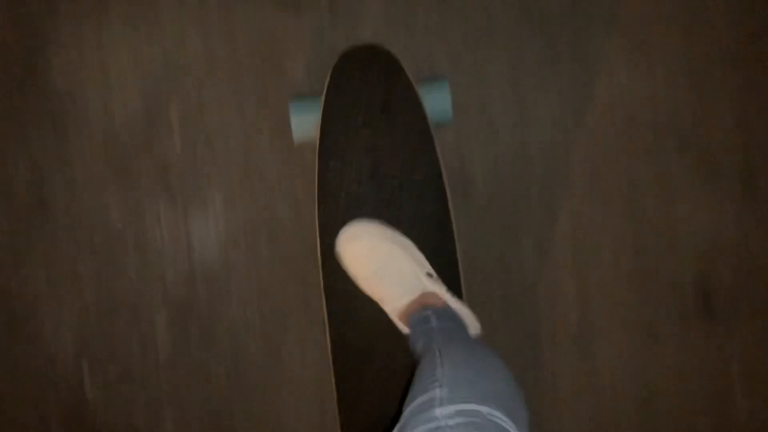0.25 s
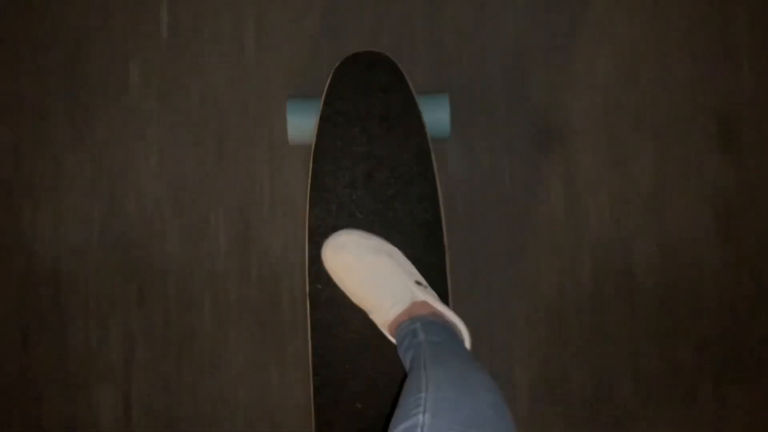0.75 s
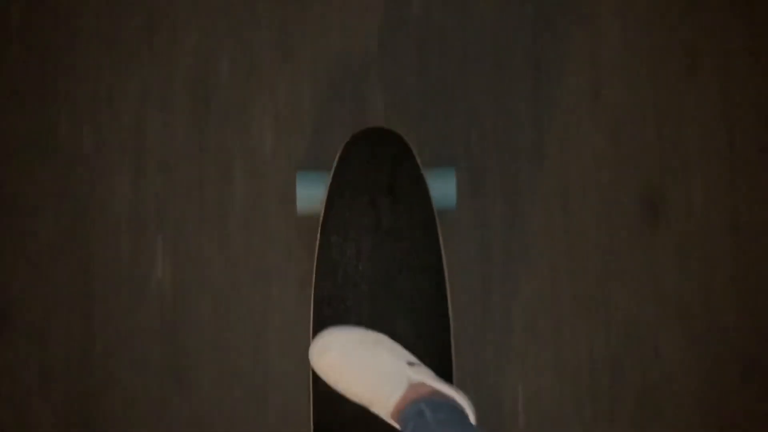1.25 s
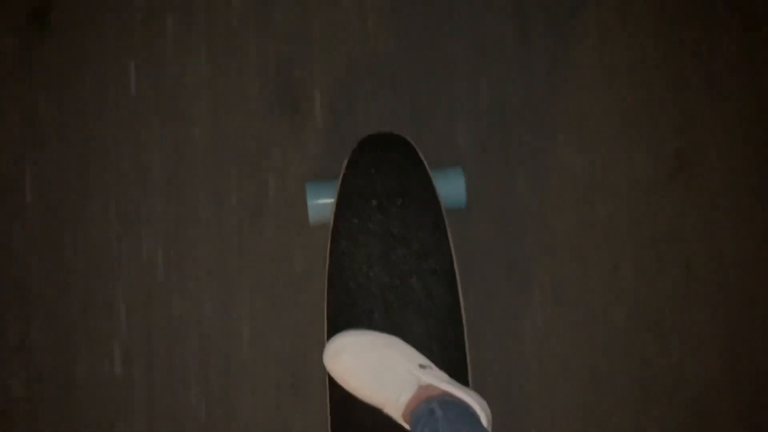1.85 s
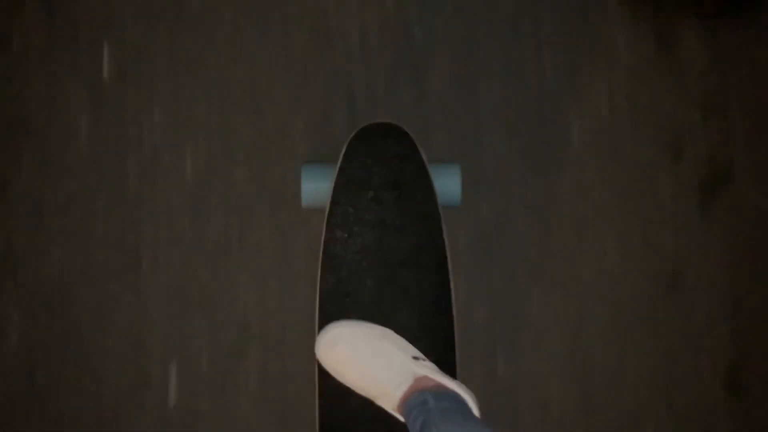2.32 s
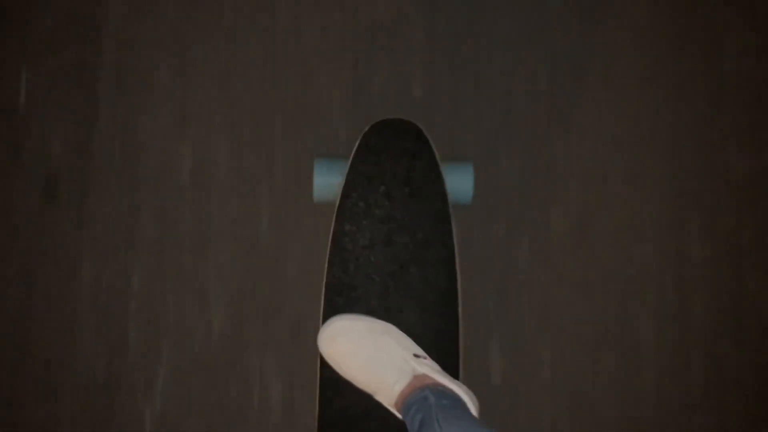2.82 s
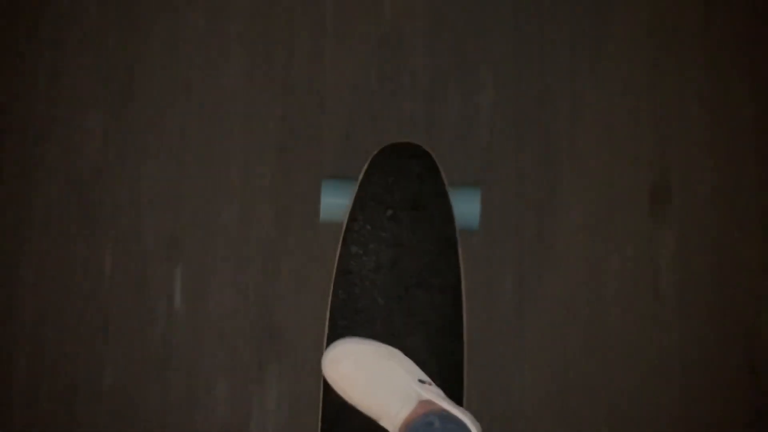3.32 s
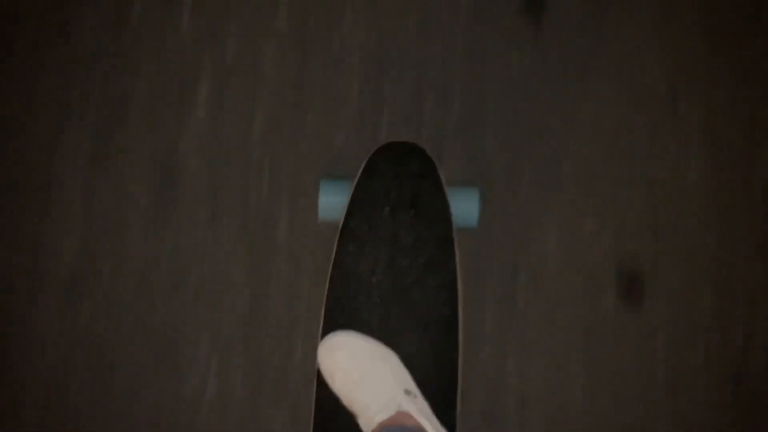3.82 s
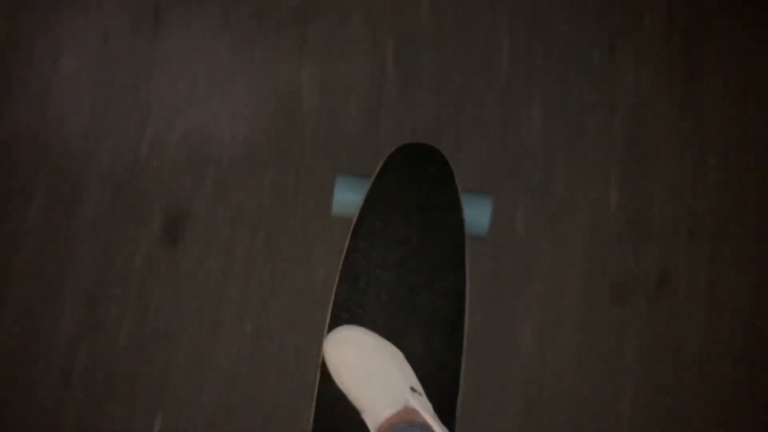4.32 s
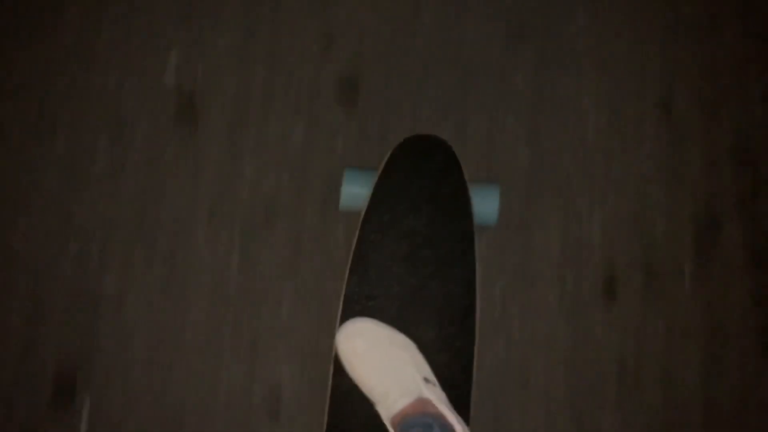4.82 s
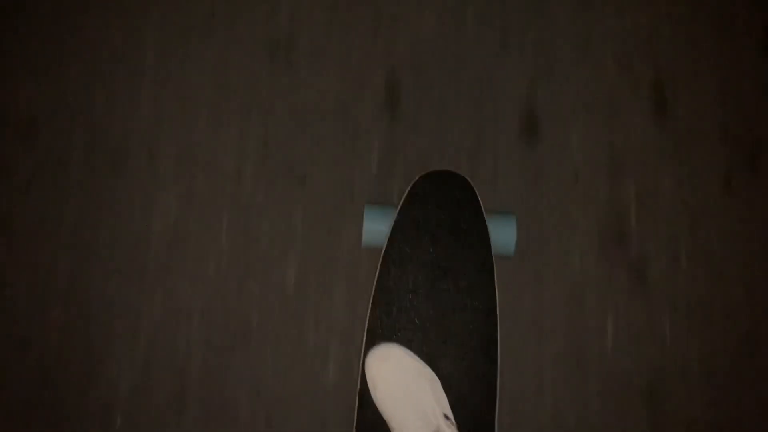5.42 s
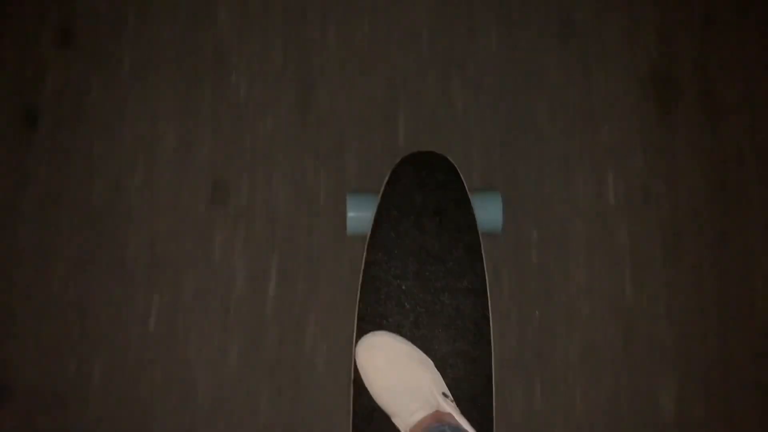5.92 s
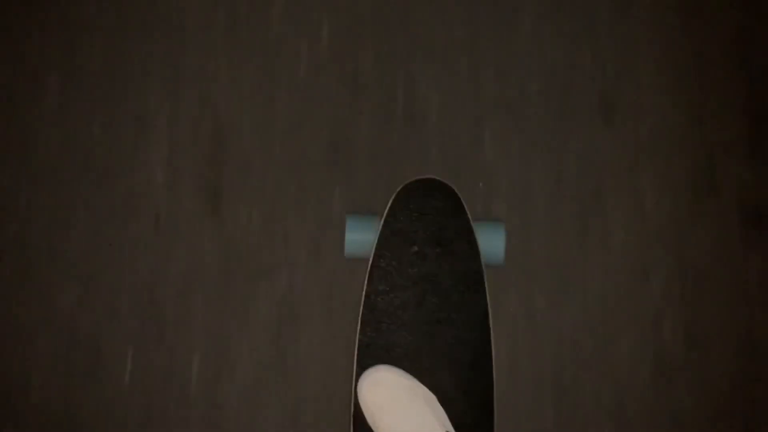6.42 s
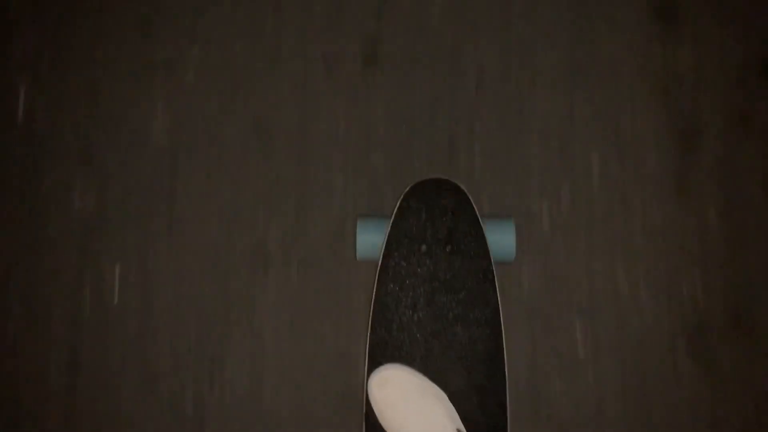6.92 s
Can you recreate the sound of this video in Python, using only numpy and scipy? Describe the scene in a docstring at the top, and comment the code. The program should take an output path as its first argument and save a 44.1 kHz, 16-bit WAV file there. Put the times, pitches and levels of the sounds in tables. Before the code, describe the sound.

Handheld stereo phone view from a rider above a longboard on a quiet street. After a brief scrape and dull wooden thump, a continuous deep wheel rumble takes over, slightly hollow at first with a sinking deck hum, then settling. Uneven road makes it swell and shiver. Dry grit clicks, bursts of scratchy cloth and soft wind thuds pass over it, strongest cloth near the end, with only faint hiss behind.

```python
"""Longboard on night asphalt

A longboard coasts over asphalt at night, heard from a phone in the rider's hand.
Random stone kicks, coloured by deck and wheels, make the rumble, flex and roar; one road strength drives all three.
Bearings whirr and sing, air buffets the phone, grit ticks, a sole scuffs and the loaded deck knocks and hums.
Close by, uneven stick-slip noise makes the rider's clothes swish and scratch, and noise bursts snap."""
import sys
import numpy as np
from scipy import signal
from scipy.fft import rfft, irfft, next_fast_len
from scipy.io import wavfile
from scipy.ndimage import uniform_filter1d, map_coordinates

SR = 44100
rng = np.random.default_rng(int(sys.argv[2]) if len(sys.argv) > 2 else 0)


def unload_wav(signal):
    """Save mono or channel-first audio to the path in sys.argv[1] as 16-bit WAV at rate SR, clipped to [-1, 1]."""
    wavfile.write(
        sys.argv[1],
        SR,
        np.round(np.clip(np.atleast_2d(signal).T, -1, 1) * 32767).astype(np.int16),
    )


N = 315535


def amp(db):
    """Decibels to gain."""
    return 10 ** (np.asarray(db) / 20)


def unit(x):
    """x at rms 1."""
    return x / np.sqrt(np.mean(x ** 2) + 1e-20)


def along(points, hz):
    """Read (Hz, value) points on a log frequency axis."""
    f, v = np.transpose(points)
    return np.interp(np.log(hz + 1), np.log(f + 1), v)


def curves(rows):
    """One value per sample for each column after the time."""
    s, *cols = np.transpose(rows)
    return [np.interp(np.arange(N) / SR, s, c) for c in cols]


def wobble(rate):
    """A smooth random curve, rate knots a second."""
    knots = rng.standard_normal(int(N * rate / SR) + 4)
    return map_coordinates(knots, [np.arange(N) * rate / SR])


def filtered(x, response):
    """x times a complex response of frequency."""
    m = next_fast_len(N + SR // 2)
    return irfft(rfft(x, m) * response(np.fft.rfftfreq(m, 1 / SR)), m)[..., :N]


def ringing(x, spectrum, size=2048):
    """x through a causal body with the given spectrum and unit energy."""
    cepstrum = irfft(np.log(amp(along(spectrum, np.fft.rfftfreq(size, 1 / SR)))))
    # folding the cepstrum gives minimum phase: the body answers at once
    cepstrum[1:size // 2] *= 2
    cepstrum[size // 2 + 1:] = 0
    answer = irfft(np.exp(rfft(cepstrum)))
    return signal.fftconvolve(x, answer / np.linalg.norm(answer))[:N]


def spread(pair, spectrum, alike):
    """Two unrelated signals become coloured stereo whose centre has rms 1."""
    def mid_and_side(hz):
        turn = np.arccos(np.clip(along(alike, hz), -1, 1)) / 2
        return amp(along(spectrum, hz)) * [np.cos(turn), np.sin(turn)]

    mid, side = filtered(pair, mid_and_side)
    return np.array([mid + side, mid - side]) / np.std(mid)


def pan(x, left_db):
    """Tip the balance towards the left."""
    return x * amp([[left_db / 2], [-left_db / 2]])


def even(pair, span=0.11):
    """A steady load: the same power over every span of seconds."""
    power = uniform_filter1d(pair.mean(0) ** 2, int(span * SR))
    return pair / np.sqrt(np.abs(power) + 1e-6)


def stroke(start, hold, db, edge, build_db=0):
    """Gain of one movement: it fades in, builds up to db while it holds, and fades out."""
    t = np.arange(N) / SR - start
    outside = np.maximum(np.maximum(-t, t - hold), 0)
    build = build_db * (1 - np.clip(t / hold, 0, 1))
    fade = 20 * np.minimum(outside / edge, 10) ** 1.5
    return amp(db - build - fade)


def resonance(hz, width_hz):
    """A narrow band of rms 1 that wavers around a steady or moving pitch."""
    phase = 2 * np.pi * np.cumsum(hz * np.ones(N)) / SR
    return unit(wobble(width_hz) * np.cos(phase) + wobble(width_hz) * np.sin(phase))


def asphalt(stones=6000):
    """Kicks of the road's stones, so many a second, on the left and right wheel tracks."""
    return (rng.random((2, N)) < stones / SR) * rng.standard_normal((2, N))


def patchy(pair, depth_db, size=512):
    """The asphalt changes under the wheels: each band swells and sinks on its own."""
    bands = signal.stft(pair, nperseg=size)[2]
    field = rng.standard_normal(bands.shape[1:])
    field = uniform_filter1d(field, size=2, axis=0)  # smooth over frequency
    field = uniform_filter1d(field, size=16, axis=1)  # smooth over time
    return signal.istft(bands * amp(depth_db * unit(field)), nperseg=size)[1][:, :N]


ROLL_START_S, ROLL_ATTACK_S = 0.13, 0.0071


def rolling():
    """0 until the wheels roll, then a quick rise to 1."""
    return np.clip((np.arange(N) / SR - ROLL_START_S) / ROLL_ATTACK_S, 0, 1)


USUAL_DB = -35  # deck rumble on usual road
PATCH_DB, PATCHES_PER_S = .5, 16  # coarser and finer patches of asphalt
# How hard the road shakes the board. Each row: time in seconds, deck rumble in dB before patches and swells.
ROAD_STRENGTH = [(.13, -38), (.22, -36), (.55, -35), (.72, -37), (1.8, -35), (2.9, -36.5), (3.6, -34),
                 (4.2, -34), (5.2, -35), (5.8, -35), (6.25, -37), (7.15, -36.5)]


def road():
    """dB by which the asphalt shakes the board more than usual."""
    return curves(ROAD_STRENGTH)[0] - USUAL_DB + PATCH_DB * wobble(PATCHES_PER_S)


SWELL_S = 0.053  # from the middle of a swell or dip until its dB falls to 1/e
# Short swells and dips of the rumble and the flex. Each row: time of the middle in seconds,
# change of the rumble in dB, change of the flex in dB.
RUMBLE_SWELLS = [(.57, 0.5, 0.5), (1.32, 2.5, -5), (2.43, 1.5, 2.5), (2.68, 2, 4.5), (2.84, 2.5, 2.5),
                 (3.06, 3.5, 8), (3.44, 2.5, 2.5), (3.65, 1.5, 1.5), (3.88, 2, 1), (4.02, 0.5, 3.5),
                 (4.15, 3, 0), (4.41, -1, 4), (4.65, 0.5, 6), (4.77, 0.5, 0.5), (4.9, 3, 1), (5.56, 1, 2.5),
                 (5.78, 2.5, 1.5), (6.58, -1, 4)]


def swells():
    """Short bell-shaped changes in dB of the rumble and of the flex."""
    t = np.arange(N) / SR
    total = np.zeros((2, N))
    for s, rumble_db, flex_db in RUMBLE_SWELLS:
        bell = np.exp(-np.minimum(((t - s) / SWELL_S) ** 2, 20))
        total += np.outer([rumble_db, flex_db], bell)
    return total


# Riding position. Each row: time in seconds, stance from 0 (first position) to 1 (settled).
RIDING_STANCE = [(0, 0), (1.1, 0), (1.5, .6), (2.1, 1), (7.15, 1)]
# Deck colour in the first position. Each row: frequency in Hz, relative level in dB.
FIRST_DECK_TONE = [(29, -55), (50, -31.5), (91, -5.5), (104, -10), (119, -16), (172, -24), (209, -13.5),
                   (230, -4.5), (258, -4.5), (285, -4.5), (323, -4.5), (375, -4), (455, -3), (575, -15.5),
                   (640, -15), (830, -32.5), (1410, -120)]
# Deck colour in the settled stance. Each row: frequency in Hz, relative level in dB.
SETTLED_DECK_TONE = [(88, -43), (150, -11.5), (194, -3), (291, 2.5), (322, -3), (345, -1), (475, -2.5),
                     (502, -3), (560, -15.5), (640, -14.5), (830, -61.5), (1410, -120)]
# Likeness of left and right, shared by most layers. Each row: frequency in Hz, likeness from 0 to 1.
STEREO_LIKENESS = [(60, 0.95), (120, 0.95), (240, 1), (480, .97), (620, .87), (1000, 0.9), (1350, 0.5),
                   (1890, 0), (3770, 0.1), (7520, 0.02), (15000, 0.2)]


def deck_rumble(level_db):
    """Stones shake the deck, whose colour crossfades as the rider settles."""
    stance = curves(RIDING_STANCE)[0]
    first = pan(spread(asphalt(), FIRST_DECK_TONE, STEREO_LIKENESS), left_db=1.0)
    settled = pan(spread(asphalt(), SETTLED_DECK_TONE, STEREO_LIKENESS), left_db=0.25)
    blend = np.sqrt(1 - stance) * first + np.sqrt(stance) * settled
    return amp(USUAL_DB + level_db) * even(patchy(blend, depth_db=1.0))


WIDE_DB, WIDE_FADE = -39, 0.4  # level at first, power that shapes the fade
# Colour of the wide rumble. Each row: frequency in Hz, relative level in dB.
WIDE_RUMBLE_TONE = [(24, -54), (40, -18), (83, -6), (124, -0.5), (173, -9.5), (242, -2.5), (292, -21),
                    (330, -24), (430, -59.5), (730, -120)]


def wide_rumble():
    """Low rumble opposed in the two ears; wide at first, it fades over the first two seconds."""
    fade = (1 - curves(RIDING_STANCE)[0]) ** WIDE_FADE  # shares the timing of the stance curve
    rumble = unit(ringing(asphalt()[0], WIDE_RUMBLE_TONE, size=8192))
    return amp(WIDE_DB) * fade * rumble * [[1], [-1]]


ROAR_DB, ROAR_FOLLOWS = -50, 0.72  # level on usual road, and its dB per dB of road strength
# Colour of the wheel roar. Each row: frequency in Hz, relative level in dB.
ROAR_TONE = [(320, -39), (540, -4.5), (570, -3.5), (616, -6.5), (779, -3.5), (832, -5.5), (997, -9.5),
             (1180, -20), (1430, -17), (1570, -28.5), (2000, -45.5), (2600, -53.5), (4400, -120)]


def wheel_roar(road_db, turn):
    """Stones make the urethane wheels roar, louder on rough road."""
    roar = pan(spread(asphalt(stones=3500), ROAR_TONE, STEREO_LIKENESS), left_db=3.0)
    return amp(ROAR_DB + ROAR_FOLLOWS * road_db + 0.22 * turn) * roar


# Colour of the bearings. Each row: frequency in Hz, relative level in dB.
BEARING_TONE = [(1060, 6.5), (1800, 2), (2190, -4.5), (2610, 1.5), (2840, -1), (3320, -2.5), (3860, -6.5),
                (4450, 0), (4790, -5), (5200, -20.5), (7000, -23.5), (11900, -36.5)]


def bearing_whirr(turn):
    """Dense random kicks whirr through the bearings' colour; the level wavers."""
    whirr = spread(asphalt(stones=6800), BEARING_TONE, STEREO_LIKENESS)
    return amp(-68 + 2.4 * wobble(1.748) + 0.55 * turn) * whirr


# Wheel speed. Each row: time in seconds, turns a second before a small random waver.
WHEEL_SPEED = [(0, 14), (2, 14.8), (4.5, 19), (7.15, 29)]
# Lead of the left port for the board. Each row: frequency in Hz, lead in radians.
BOARD_PORT_LEAD = [(50, -.4), (100, 0), (200, .2), (450, .5), (600, .75), (900, .5), (1200, 1), (1450, 1.7),
                   (1600, 3)]


def board(road_db, rumble_swell_db):
    """Stones shake deck and wheels; slightly oval wheels throb once a turn."""
    turns = np.cumsum(curves(WHEEL_SPEED)[0] + 0.6 * wobble(5.0)) / SR
    turn = np.sin(2 * np.pi * turns)
    deck = deck_rumble(road_db + rumble_swell_db + 0.8 * turn)
    wide = wide_rumble()
    wheels = patchy(wheel_roar(road_db, turn) + bearing_whirr(turn), depth_db=1.5)

    def lead(hz):
        return np.exp(.5j * np.outer([1, -1], along(BOARD_PORT_LEAD, hz)))

    return rolling() * (wide + filtered(deck + wheels, lead))


FLEX_DB, FLEX_FOLLOWS = -43, 0.14  # level on usual road, and its dB per dB of rumble
BOUNCE_DB, BOUNCES_PER_S = 1.16, 11  # the flex swells and sinks at random
# Colour of the deck flex. Each row: frequency in Hz, relative level in dB.
FLEX_TONE = [(36, -56), (62, -10), (113, 1), (129, 1), (151, -10), (175, -5), (230, -33), (390, -120)]


def deck_flex(rumble_db, flex_swell_db):
    """The deck flexes under the settled rider, more on rough road, with swells and dips of its own."""
    flex_db = FLEX_DB + FLEX_FOLLOWS * rumble_db + flex_swell_db + BOUNCE_DB * wobble(BOUNCES_PER_S)
    flex = even(spread(asphalt(), FLEX_TONE, STEREO_LIKENESS), span=0.19)
    return curves(RIDING_STANCE)[0] ** 2 * amp(flex_db) * flex


# A deck hum under the rider's weight. Each row: time in seconds, pitch in Hz, level in dB before a 0.5 dB trim.
DECK_HUM = [(.14, 398.6, -46.5), (.58, 400, -35), (.7, 310, -55), (1, 273.2, -39), (1.35, 237.7, -42.5),
            (1.9, 214.8, -38), (2.15, 209.5, -55.5), (2.5, 210.1, -95.5)]


def sag():
    """One resonance of the deck stands out and sinks in pitch as the rider's weight settles."""
    hz, db = curves(DECK_HUM)
    started = np.arange(N) / SR > DECK_HUM[0][0]
    return amp(db - 0.5) * resonance(hz, width_hz=120) * started


# The deck takes the load. Each row: start in seconds, peak level in dB.
LOAD_KNOCKS = [(0.102, -27)]


def knock(pitch_hz=295, t60=0.031, attack=0.0051):
    """One dull knock of the deck as it takes the load: a quickly damped sine."""
    out, t = np.zeros(N + SR), np.arange(SR // 10) / SR
    onset = 1 - np.exp(-(t / attack) ** 2)
    ring = amp(-60 * t / t60) * np.sin(2 * np.pi * pitch_hz * t) * onset
    for s, db in LOAD_KNOCKS:
        out[round(s * SR):][:len(t)] += amp(db) * ring / np.abs(ring).max()
    return out[:N]


# Steel rings of the bearings. Each row: centre pitch in Hz, width in Hz.
BEARING_RINGS = [(3066, 400), (4506, 270)]
# Loudness of the rings before flicker. Each row: time in seconds, lower ring in dB, upper ring in dB.
RING_LEVELS = [(.2, -80, -68), (.6, -81, -86), (1, -78, -81.5), (1.4, -78, -82), (2.2, -79.5, -82),
               (2.65, -80, -76), (3.05, -86, -83.5), (4.601, -77, -79), (5.8, -82.5, -81.5),
               (7.15, -80, -85)]


def races(drift=0.02, flicker_db=3.0):
    """The bearing rings sing faintly; they drift in pitch and flicker as the load shifts."""
    out = np.zeros((2, N))
    for (hz, width), db in zip(BEARING_RINGS, curves(RING_LEVELS)):
        pitch = hz * (1 + drift * wobble(3))
        level = amp(db + flicker_db * wobble(14))
        out += level * np.array([resonance(pitch, width), resonance(pitch, width)])
    return out


# Colour of the ticks. Each row: frequency in Hz, relative level in dB.
TICK_TONE = [(600, -21), (1300, 1), (2400, 1), (4000, 2), (9000, 1.5)]
# Grit pinched against the road. Each row: start in seconds, level in dB, upper edge of the tick in Hz.
GRIT_TICKS = [(0.0203, -37.5, 7500), (.04, -51, 7500), (.764, -51, 9000), (1.6748, -38.5, 3200),
              (1.696, -41, 3200), (3.5206, -31, 5150), (3.535, -50, 6000), (3.688, -43, 4500),
              (3.751, -56.5, 6930), (4.122, -41, 6500), (4.9562, -44, 6970), (4.97, -44, 7500),
              (4.98, -49.5, 5000), (4.989, -50.5, 6000), (5.0152, -38, 6460), (5.033, -52, 6500),
              (5.617, -47, 5035)]


def grit(t60=0.0074):
    """A grain pops out from under a wheel or sole with a dry tick: a decaying noise burst."""
    pops, t = np.zeros((2, N + SR)), np.arange(SR // 30) / SR
    for s, db, top_hz in GRIT_TICKS:
        dull = signal.butter(4, min(top_hz, SR / 3), fs=SR, output="sos")
        pop = signal.sosfilt(dull, rng.standard_normal((2, len(t))) * amp(-60 * t / t60))
        makeup = np.sqrt(SR / 2 / top_hz)  # restores the power that the low-pass takes
        pops[:, round(s * SR):][:, :len(t)] += amp(db) * makeup * pop
    return np.array([ringing(side[:N], TICK_TONE) for side in pops])


# Colour of the scuff. Each row: frequency in Hz, relative level in dB.
SOLE_TONE = [(53, -14), (90, 3.5), (298, 0.5), (765, -20), (816, -5), (950, -14), (1100, -10.5),
             (1210, -1.5), (1290, -9.5), (1380, -5), (1600, -21.5), (3250, -17.5), (3620, -3.5),
             (3900, -10.5), (4200, -7.5), (4930, -21), (6240, -18.5), (11900, -46.5), (15000, -41.5)]
# A hard bite, then a light drag. Each row: start in seconds, hold in seconds, level in dB,
# seconds to fade by 20 dB at either end.
SOLE_SCUFFS = [(.008, .015, -38.5, .016), (.03, .075, -58, .022)]


def scuff():
    """A sole scrapes the asphalt: stone kicks under short strokes."""
    gain = sum(stroke(*row) for row in SOLE_SCUFFS)
    return gain * spread(asphalt(stones=6500), SOLE_TONE, STEREO_LIKENESS)


def friction(slips, scatter, size_db, slip_t60, smooth):
    """Cloth sticks and slips at an uneven rate, over a smooth share of sliding; rms 1."""
    times = np.cumsum(np.exp(scatter * rng.standard_normal(N // 40)) / slips)
    sizes = amp(size_db * np.clip(rng.standard_normal(len(times)), -2, 2))
    kicks = np.bincount(np.minimum(times * SR, N).astype(int), sizes ** 2, N + 1)[:N]
    t = np.arange(SR // 40) / SR
    power = np.abs(signal.fftconvolve(kicks, amp(-60 * t / slip_t60) ** 2)[:N])
    share = np.clip(smooth, 0, 1)
    envelope = np.sqrt(share + (1 - share) * power / power.mean())
    return unit(envelope * rng.standard_normal(N))


SWISH_BUILD_DB = 1.5  # a swish grows this much while it lasts
# Colour of soft cloth. Each row: frequency in Hz, relative level in dB.
SOFT_CLOTH_TONE = [(400, -22.5), (1300, 11.5), (1900, 5), (2450, 8.5), (3600, -1), (4500, -7), (5800, -12),
                   (6800, -8), (8500, -14.5), (11000, -16.5), (15500, -34)]
# Soft cloth swishes. Each row: start in seconds, hold in seconds, level in dB before a 5.5 dB lift,
# seconds to fade by 20 dB at either end.
CLOTH_SWISHES = [(0.148, .018, -53, 0.1), (0.726, .09, -59, .06), (1.47, .4, -68.5, .03),
                 (2.005, 0.112, -64.5, 0.18), (3.47, 0.26, -64, 0.09), (4.099, .035, -63.5, .07),
                 (4.961, .058, -55, .06), (5.293, 0.017, -72, 0.17), (5.61, .025, -66.5, 0.14),
                 (6.373, .12, -70.5, 0.15)]


def swishes():
    """Soft cloth slides in strokes of fine, uneven slips."""
    sliding = friction(slips=240, scatter=.7, size_db=2.2, slip_t60=.005, smooth=.45)
    gain = sum(stroke(*row, SWISH_BUILD_DB) for row in CLOTH_SWISHES)
    return gain * amp(5.5) * ringing(sliding, SOFT_CLOTH_TONE)


SCRATCH_EDGE_S = .026  # time to fade by 20 dB at either end
# Where the top part of a scratch begins. Each row: frequency in Hz, gain of the top part.
TOP_SHARE = [(4500, 0.021), (7500, 0.87)]
# Stiff cloth scratching. Each row: start in seconds, length in seconds, final level in dB,
# build-up in dB (negative sinks), top part in dB.
CLOTH_SCRATCHES = [(0.141, 0.088, -69.5, -5, -3.5), (1.461, .125, -61, 0.5, -0.5),
                   (1.745, .1, -65, 0.5, -1), (2.0, .12, -55.5, 3, 4.5), (3.5, .22, -70, 0.5, -4.5),
                   (5.065, .15, -60.5, 3, -3.5), (5.405, 0.016, -62.5, 1, -2.5),
                   (5.704, 0.024, -58, 3.5, -1), (6.05, 0.043, -66, 0, -1), (6.149, .15, -57.5, 4, -.5),
                   (6.774, .055, -67, 0.5, -3)]


def scratching():
    """Stiff cloth drags in a quick run of small slips, each scratch with its own build-up."""
    body, top = np.zeros(N), np.zeros(N)
    slipping = friction(slips=150, scatter=.25, size_db=1.8, slip_t60=.014, smooth=.3)
    for s, length, db, build_db, top_db in CLOTH_SCRATCHES:
        scratch = stroke(s, length, db, SCRATCH_EDGE_S, build_db) * slipping
        body += scratch
        top += (amp(top_db) - 1) * scratch
    return body + filtered(top, lambda hz: along(TOP_SHARE, hz))


# Folds catching and snapping over. Each row: start in seconds, hold in seconds, level in dB before a trim,
# low part in dB before a 10 dB lift, top part in dB before a 19.5 dB lift.
FOLD_SNAPS = [(1.4676, 0.0022, -52.5, -16, -16), (1.478, .001, -48, -12, -16),
              (1.489, .001, -46, -18.5, -13), (1.5065, 0.0033, -51, -14, -14), (1.514, .004, -54, -10, -14),
              (1.5347, .002, -50, -12, -13), (1.5586, 0.0018, -49, -12, -14),
              (1.5695, 0.0032, -50, -14, -11.5), (1.576, .003, -49.5, -12, -13.5),
              (1.6023, .001, -46, -24, -19), (1.637, .001, -45.5, -21.5, -23.5),
              (1.7427, 0.0024, -49, -9, -16.5), (1.758, 0.0018, -47.5, -2.5, -16),
              (1.7848, 0.0022, -47.5, -19, -18.5), (1.821, .001, -49, -5, -17),
              (1.8295, 0.0024, -51.5, -11, -19.5), (1.8551, .002, -48, -16.5, -20.5),
              (2.029, 0.0022, -52, -12, -14), (2.064, .004, -49, -12.5, -15),
              (2.083, .002, -48.5, -10, -15.5), (2.094, .004, -51, -11, -14.5),
              (2.116, .003, -48, -15, -15.5), (2.12, .003, -46, -21, -15.5),
              (2.695, .001, -64.5, -18, -13.5), (3.1052, .001, -63, -20.5, -5),
              (3.504, 0.00092, -51, -18, -6), (3.709, .001, -53, 2, -12), (3.8914, .001, -63.5, -5, -6),
              (4.14, 0.0023, -55.5, -18, -23), (4.1888, 0.0019, -46.5, -22, -22.5),
              (4.4307, 0.0018, -47.5, -12.5, -14), (4.456, 0.0033, -56.5, -8.5, -20),
              (4.491, 0.00087, -61.5, -16, -9.5), (5.104, .001, -53, -22, -23),
              (5.133, .002, -55.5, -22, -23), (5.158, .001, -48.5, -22, -19.5),
              (5.164, 0.0023, -49.5, -22, -19), (5.18, .002, -52, -22, -20.5),
              (5.1886, .001, -49, -22, -21.5), (5.2017, .002, -49.5, -24, -20),
              (5.2159, 0.0018, -49, -31, -19), (5.41, .001, -50.5, -17, -18),
              (5.417, .001, -50.5, -20, -19.5), (5.427, .001, -50.5, -16.5, -20),
              (5.659, 0.0012, -48.5, -21.5, -28), (5.684, 0.0022, -51.5, -18, -20),
              (5.705, 0.0018, -47, -18, -18), (5.716, .002, -46.5, -14, -18),
              (6.055, .002, -53.5, -21, -20), (6.069, 0.0026, -50.5, -21, -17),
              (6.09, .002, -51, -18, -22.5), (6.13, 0.0078, -53.5, -14, -20.5),
              (6.1515, .006, -50, -19, -19), (6.17, .009, -49, -16, -18.5), (6.1881, .004, -45.5, -15, -20),
              (6.2136, .006, -45.5, -15, -22), (6.2355, .003, -46, -14, -20),
              (6.243, .002, -44.5, -12, -19), (6.265, .003, -44.5, -8.5, -21.5),
              (6.277, 0.0048, -46, -8, -20.5), (6.285, .003, -46, -8, -24), (6.3, .002, -46.5, -9, -21),
              (6.3115, .003, -50.5, -12.5, -23.5), (6.4, .003, -47, -9, -22),
              (6.4364, 0.0023, -46, -9, -28.5), (6.446, 0.00325, -48, -9.5, -25.5),
              (6.4526, .002, -45.5, -8, -26), (6.488, .003, -46.5, -15.5, -22),
              (6.495, 0.005, -50.5, -8, -22.5), (6.5162, 0.0012, -45.5, -11, -27)]


def snaps(t60, attack):
    """Each fold lets go with a short rasp of its own length and brightness."""
    out, t = np.zeros(N + SR), np.arange(SR // 25) / SR
    hz = np.fft.rfftfreq(len(t), 1 / SR)
    onset = 1 - np.exp(-t / attack)
    for s, hold, db, low_db, top_db in FOLD_SNAPS:
        tilt = amp(along([(2400, low_db + 10.0), (4500, 0.0028), (6500, 0), (12000, top_db + 19.5)], hz))
        crack = irfft(rfft(rng.standard_normal(len(t))) * tilt, len(t))
        decay = amp(db - 60 * np.maximum(t - hold, 0) / t60)
        out[round(s * SR):][:len(t)] += decay * crack * onset
    return out[:N]


# Unscattered share of cloth sound. Each row: frequency in Hz, share of the power from 0 to 1.
DIRECT_SHARE = [(1000, .6), (2500, .4), (4200, .8), (6000, .4), (8300, .93), (15000, .93)]
# Lead of the left port for nearby sounds. Each row: frequency in Hz, lead in cycles.
NEARBY_PORT_LEAD = [(0, 0), (1800, .45), (4100, 1), (6200, 1.2), (8400, 1.5), (11000, 2), (13500, 2.5),
                    (15700, 3)]


def nearby(x, scatter_t60=0.014):
    """A close source reaches the left port first; the moving arm and body scatter part of it."""
    t = np.arange(SR // 30) / SR
    tails = rng.standard_normal((4, 2, len(t))) * amp(-60 * t / scatter_t60)
    tails = tails / np.linalg.norm(tails, axis=2, keepdims=True)
    paths = signal.fftconvolve(x[None, None], tails, axes=2)[..., :N]
    shifting = np.array([wobble(8) for _ in paths])
    weights = shifting / np.linalg.norm(shifting, axis=0)
    scattered = np.sum(paths * weights[:, None], axis=0)

    def share(hz):
        return np.clip(along(DIRECT_SHARE, hz), 0, 1)

    def lead(hz):
        cycles = np.interp(hz, *np.transpose(NEARBY_PORT_LEAD))
        return np.exp(1j * np.pi * np.outer([1, -1], cycles))

    direct = filtered(x, lambda hz: np.sqrt(share(hz)) * lead(hz))
    return direct + filtered(scattered, lambda hz: np.sqrt(1 - share(hz)))


# Colour of stiff cloth. Each row: frequency in Hz, relative level in dB.
STIFF_CLOTH_TONE = [(700, -26), (2000, 0.5), (3300, -2), (3850, 6), (4300, 1.5), (4750, 5.5), (5400, -4.5),
                    (6100, 1), (7000, -5.5), (7800, -12), (8800, -13), (10200, -9.5), (11200, -14.5),
                    (13500, -8.5), (15500, -20)]


def clothes():
    """Soft cloth swishes; stiff cloth scratches and snaps."""
    cracks = amp(-1.84) * snaps(t60=.012, attack=.0004)
    stiff = ringing(scratching() + cracks, STIFF_CLOTH_TONE)
    return rolling() * nearby(swishes() + stiff)


# Colour of the buffeting. Each row: frequency in Hz, relative level in dB.
BUFFET_TONE = [(15, -1.5), (28, 11.5), (42, 22.5), (56, 30.5), (74, 25), (100, 1), (180, -120)]
# Strength of the passing air. Each row: time in seconds, buffet level in dB.
AIR_LEVEL = [(0, -59), (.9, -56), (1.9, -67.5), (2.9, -64), (3.9, -54.5), (4.07, -49.5), (4.25, -54),
             (4.68, -44.5), (4.95, -50), (5.5, -60), (5.8, -48.5), (6.03, -44.5), (6.45, -49), (6.62, -51),
             (6.9, -60.5), (7.15, -55)]


def air_buffet():
    """The passing air buffets the phone: deep noise that swells and sinks."""
    noise = rng.standard_normal((2, N))
    return amp(curves(AIR_LEVEL)[0]) * spread(noise, BUFFET_TONE, STEREO_LIKENESS)


# Colour of the night hiss. Each row: frequency in Hz, relative level in dB.
HISS_TONE = [(100, 16.5), (1000, 15.5), (4500, -1.5), (6000, 1.5), (12000, 2), (15500, -2.5)]


def night():
    """A faint even hiss: steady noise, wide in the treble."""
    likeness = [(100, 0.61), (3000, 0.012)]  # Hz, 0 to 1
    return amp(-82.5) * spread(rng.standard_normal((2, N)), HISS_TONE, likeness)


def scene():
    """Board, rider and night air."""
    rumble_swell_db, flex_swell_db = swells()
    road_db = road()
    longboard = board(road_db, rumble_swell_db) + deck_flex(road_db + rumble_swell_db, flex_swell_db)
    longboard = longboard + sag() + knock() + races() + grit()
    rider = scuff() + pan(clothes(), left_db=-0.5)
    return longboard + rider + air_buffet() + night()


TOP_HZ = 15900


def record(dry):
    """The phone keeps nothing above its band limit."""
    return filtered(dry, lambda hz: hz < TOP_HZ)


dry = scene()
out = record(dry)
unload_wav(out)
```